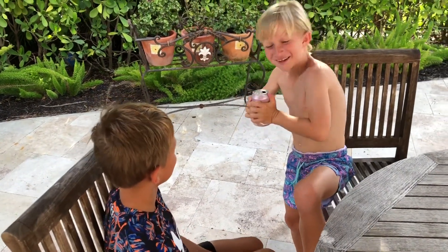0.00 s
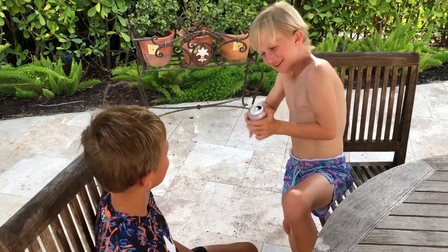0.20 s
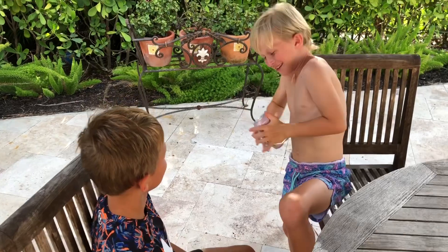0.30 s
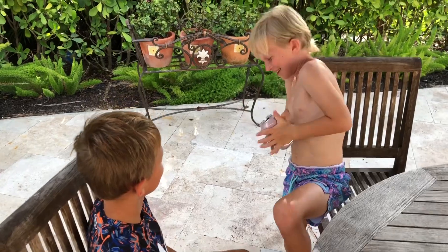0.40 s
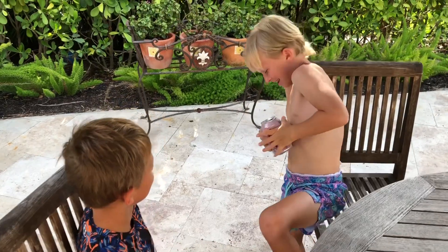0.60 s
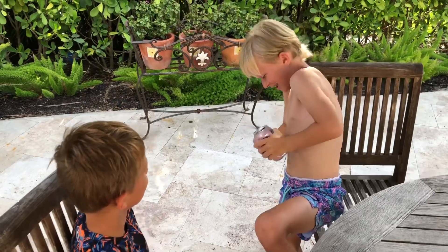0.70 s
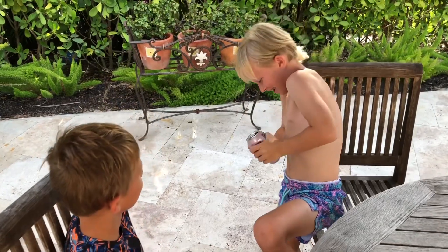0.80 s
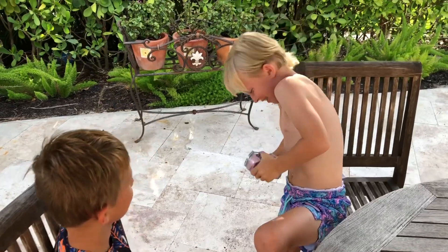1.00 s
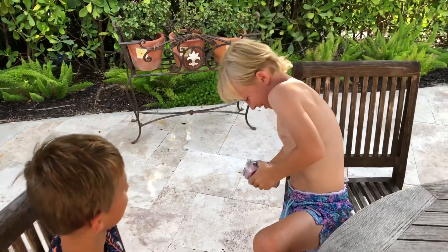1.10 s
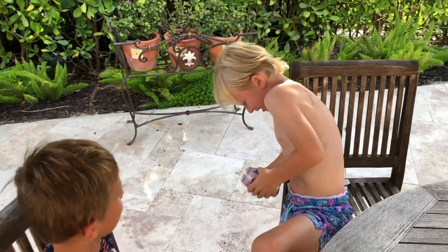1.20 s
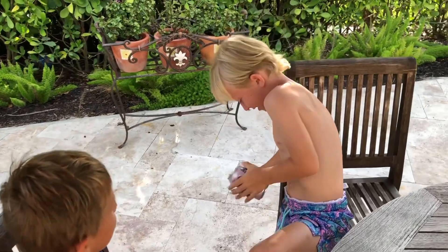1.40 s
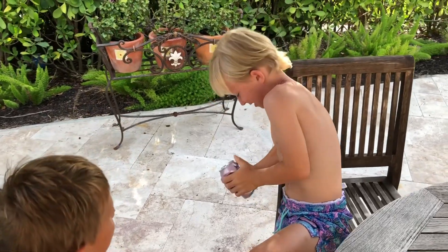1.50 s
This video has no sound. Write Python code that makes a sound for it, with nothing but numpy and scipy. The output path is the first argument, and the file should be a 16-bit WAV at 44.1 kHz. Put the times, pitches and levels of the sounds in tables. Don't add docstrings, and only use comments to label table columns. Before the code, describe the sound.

Crumpling drink can, outdoors: a lone loud pop, light clicks, a rapid cluster of tinny cracks ending in a strong double snap, then soft bumps over low garden noise, with short echoes from paving and wall.

```python
import sys
import numpy as np
from scipy import signal
from scipy.fft import rfft, irfft
from scipy.io import wavfile
from scipy.ndimage import uniform_filter1d

SR = 44100
rng = np.random.default_rng(int(sys.argv[2]) if len(sys.argv) > 2 else 0)


def store_pcm(level_fs):
    pcm = np.round(np.clip(level_fs, -1, 1) * 32767).astype(np.int16)
    wavfile.write(sys.argv[1], SR, np.atleast_2d(pcm).T)


def volts(x):
    e = np.asarray(x, float) / 20
    return 10 ** e


N = 70560


def read(table, hz):
    points = np.array(table)
    return np.interp(np.log(hz), np.log(points[:, 0]), points[:, 1])


def ring(hz, db, t60_s, sign=1, late_s=0, size=2600):
    t = np.maximum(np.arange(size) / SR - np.reshape(late_s, (-1, 1)), 0)
    pole = -np.log(1000) / np.maximum(t60_s, .003) + 2j * np.pi * np.minimum(hz, .45 * SR)
    return (sign * volts(db)) @ np.exp(pole[:, None] * t).imag


def peak(x, db):
    can_db = -1
    return x * volts(db + can_db) / np.abs(x).max()


def walk(rate_hz):
    k = int(SR / rate_hz)
    steps = np.repeat(rng.standard_normal(N // k + 2), k)
    x = uniform_filter1d(uniform_filter1d(steps, k), k)[:N]
    return x / x.std()


def buckle(crack_db, dent_db, dent_hz, crack_hz, focus_db, focus_oct, length_s, count=160, size=6):
    # frequency in Hz, level in dB.
    wall_modes = [(1500, -0.5), (3000, -5.5), (6000, -5.5), (9000, -4.5), (13000, -9.5), (17000, -12.5)]
    # ratio to dent pitch, level in dB, t60 in seconds for a 1.2 kHz dent.
    dent_modes = [(.45, -18, .014), (.62, -13, .014), (.8, -8, .016), (1.0, 0, .028), (1.12, -6, .02),
                  (1.3, -6, .014), (1.55, -7, .014), (1.85, -9, .014), (2.2, -11, .014)]
    # frequency in Hz, level in dB re dent, t60 in seconds.
    end_modes = [(840, -39.5, 0.084), (1115, -22, 0.072), (1095, -25.5, 0.15), (1180, -27, 0.097),
                 (1640, -19.5, 0.11), (1900, -25, .15)]
    luck, slip = rng.standard_normal((count, 4)), rng.random((size, 3))
    single = length_s < .005

    def colour(f):
        octaves = np.log2(f / crack_hz)
        return read(wall_modes, f) + focus_db * np.exp(-.5 * (octaves / focus_oct) ** 2)

    fall_db, scatter_db = -8.5, 5
    late = np.sort(slip[:, 0]) - slip[:, 0].min()
    slip_db = fall_db * late + scatter_db * slip[:, 2] * (late > 0)
    slip_db += scatter_db * (late == 0) * single

    hz = np.linspace(1200, 17000, count) + 40 * luck[:, 0]
    which = rng.integers(0, size, count)
    wall_db = colour(hz) + slip_db[which] + 4 * luck[:, 1]
    wall_t60_s = .013 * (hz / 5000) ** -.046
    wall = ring(hz, wall_db, wall_t60_s, np.sign(luck[:, 3]), late[which] * length_s)

    f = np.arange(1, 130) * SR / 256
    snap_spectrum = volts(colour(f)) * np.minimum(f / 1500, 1) ** 2 * -1j
    snap = peak(np.roll(irfft(snap_spectrum), 12), crack_db)

    ratio, mode_db, t60_s = np.array(dent_modes).T
    odd = luck[:len(dent_modes)] * (ratio != 1)[:, None]
    mode_hz = dent_hz * ratio * (1 + .04 * odd[:, 2])
    mode_t60_s = t60_s * (dent_hz / 1200) ** -.06
    dent = ring(mode_hz, mode_db + 2 * odd[:, 0], mode_t60_s, size=7000)

    end_hz, end_db, end_t60_s = np.array(end_modes).T
    end_luck = luck[-len(end_modes):]
    end_hz = end_hz * (1 + .019 * end_luck[:, 0])
    dent += ring(end_hz, end_db + 2.5 * end_luck[:, 1], end_t60_s, size=7000)

    push_s, later_slip_db = .0002, -10.5
    slips = np.zeros(int(length_s * SR) + 2)
    push = np.sign(slip[:, 1] - .5) * volts(2 * slip_db + later_slip_db * (late > 0))
    np.add.at(slips, (late * length_s * SR).astype(int), push)
    dent = np.convolve(dent, np.hanning(int(push_s * SR) + 3), "same")
    dent = peak(signal.fftconvolve(dent, slips), dent_db)

    dent_echo_db, snap_db, snap_echo_db = -5, 0, 6.5
    direct, echoed = dent.copy(), dent * volts(dent_echo_db)
    direct[:len(wall)] += peak(wall, crack_db)
    direct[:256] += snap * volts(snap_db) * single
    echoed[:256] += snap * volts(snap_echo_db)
    return np.array([direct, echoed])


def can(lead):
    # start in seconds, crack in dB, dent in dB, dent pitch in Hz,
    # crack centre in Hz.
    buckles = [(-.012, -9.5, -20, 1450, 6900), (0.2129, -0.5, -6, 2386, 7500),
               (0.3888, -11.5, -16, 1254, 5130), (.539, -9.5, -25, 1950, 10200),
               (.553, -5.5, -5.5, 1228, 8900), (0.57, -7, -2, 1524, 7350), (0.6007, -10, -10.5, 1900, 4420),
               (0.6131, -16.5, -12.5, 1665, 11000), (0.6346, -9.5, -12.5, 1144, 8330),
               (0.6922, -4, 0, 2370, 8600), (0.71, -9.5, -9, 1615, 5000), (0.852, -18, -18.5, 2010, 7850),
               (.9112, -4.5, 0, 1237, 8160), (0.9261, -4.5, -5, 905, 9000), (1.399, -45, -37, 1046, 7400),
               (1.46, -53, -35.5, 1680, 9600)]
    kinks = [(.010, -27, -50, 1410, 5200), (.2447, -17, -24, 1800, 4200), (0.3776, -40, -29.5, 1280, 3000),
             (0.379, -42, -25, 1520, 2950), (.458, -33, -12, 2240, 3850), (.460, -43.5, -23, 1690, 3800),
             (.519, -16, -7.5, 3310, 6910), (0.2133, -13.5, -18.5, 1103, 3200),
             (0.6924, -13.5, -9.5, 1095, 5000), (0.9085, -31, -33.5, 1230, 3000),
             (.9116, -20, -8.5, 1990, 4800), (0.612, -20.5, -11.5, 1640, 3000),
             (0.943, -17.5, -10.5, 1190, 6180), (1.0219, -22.5, -22, 1192, 4300),
             (1.22, -48, -61, 1020, 3200), (1.278, -49, -49.5, 1000, 4000)]
    # start in seconds, length in seconds, crack in dB, dent in dB,
    # dent pitch in Hz.
    crumples = [
        (.219, .022, -28, -49, 1610),
        (.576, .022, -28, -47.5, 1270),
        (.614, .016, -27.5, -27, 2105),
        (0.701, 0.012, -23.5, -16.5, 1056),
        (.714, 0.026, -16.5, -19, 2160),
        (0.718, .03, -27.5, -19.5, 1240),
        (.918, 0.012, -19, -15.5, 1290),
        (.99, 0.038, -50, -45, 1027),
    ]
    slip_s, low_hz = .0035, 373
    hits = [(s, buckle(*how, 3.5, .49, slip_s)) for s, *how in buckles]
    hits += [(s, buckle(*how, 29.5, .85, .5 * slip_s)) for s, *how in kinks]
    # focus 0 dB, plain wall colour
    hits += [(s, buckle(*how, 6000, 0, 1, length_s, size=30)) for s, length_s, *how in crumples]
    out = np.zeros((2, N + lead + SR // 2))
    for s, one in hits:
        i = int(s * SR) + lead
        out[:, i:i + one.shape[1]] += one
    return signal.sosfilt(signal.butter(4, low_hz, "high", fs=SR, output="sos"), out)


def patio():
    # delay in seconds, level in dB, t60 in seconds, top in Hz.
    echoes = [
        (.004, -7.5, .06, 14730),
        (.015, -15, 0.27, 12000),
        (0.031, -20.5, 0.6, 2500),
    ]
    t = np.arange(SR // 2) / SR
    out = 0
    for late_s, db, t60_s, top_hz in echoes:
        decay = np.exp(-np.log(1000) * t / t60_s)
        tail = rng.standard_normal(len(t)) * decay * np.clip(t / late_s, 0, 1) ** 2
        tail = signal.lfilter(*signal.butter(1, min(top_hz, 20000), fs=SR), tail)
        out = out + volts(db) * tail / np.sqrt(np.sum(tail ** 2))
    return out


def garden():
    # frequency in Hz, level in dB per Hz.
    floor_spectrum = [(24, -51.5), (40, -8), (101, -3.5), (260, -16), (577, -16.5), (1080, -20),
                      (1450, -25.5), (2160, -31.5), (15500, -51.5)]
    garden_db, gust_db, flicker_db = -46, 1.5, .7
    hum_hz, hum_db = 120, -54.5
    f = np.maximum(np.arange(N // 2 + 1) * SR / N, 1)
    spec = rfft(rng.standard_normal(N)) * volts(read(floor_spectrum, f)) * np.minimum(f / 45, 1) ** 3
    out, gust = 0, walk(12)
    for hz in 22 * 2 ** np.arange(0, 10, .5):
        window = np.cos(np.pi * np.clip(np.log2(f / hz), -.5, .5)) ** 2
        band = irfft(spec * window, N)
        sway_db = gust_db * gust * np.clip(150 / hz, 0, 1) + flicker_db * walk(7)
        out = out + band * volts(sway_db)
    hum = volts(hum_db + 4.3 * walk(5.5)) * np.sin(2 * np.pi * hum_hz * np.arange(N) / SR)
    return volts(garden_db) * out / out.std() + hum


def bumps():
    # start in seconds, level in dB, frequency in Hz, t60 in seconds.
    soft_rings = [(0.209, -21.5, 120, 0.035), (0.246, -24.5, 67.4, 0.047), (0.491, -33.5, 65.4, 0.18),
                  (.214, -18.5, 451, 0.021), (.554, -18.5, 460, .05), (.558, -29.5, 271, 0.082),
                  (.693, -20, 508, 0.033), (0.71, -32, 270, 0.065), (.929, -17, 520, 0.035),
                  (1.402, -23.5, 463, 0.019), (.388, -21.5, 1180, 0.067), (0.386, -31, 1275, 0.081),
                  (.693, -31, 1088, 0.33), (.911, -14, 1182, 0.11), (1.18, -36, 103, 0.17),
                  (1.248, -21, 141.7, 0.037), (1.255, -37.5, 51.8, 0.22)]
    size, rise_s = 8000, .0033
    rise = np.clip(np.arange(size) / SR / rise_s, 0, 1)
    out = np.zeros(N + 9000)
    for s, db, hz, t60_s in soft_rings:
        one = ring(np.array([hz]), np.array([db]), np.array([t60_s]), size=size)
        i = int(s * SR)
        out[i:i + size] += one * rise
    return out[:N]


def scene():
    lead = int(.05 * SR)
    direct, echoed = can(lead)
    heard = direct + signal.fftconvolve(echoed, patio())[:len(direct)]
    return (heard[lead:lead + N] + bumps() + garden())[None]


def low_pass(x):
    return signal.sosfilt(signal.butter(12, 16570, fs=SR, output="sos"), x)


def record(dry):
    top_hz = 15900
    cut = signal.sosfilt(signal.ellip(8, .3, 30, top_hz, fs=SR, output="sos"), dry)
    return low_pass(np.clip(cut, -1, 1))


dry = scene()
out = record(dry)
store_pcm(out)
```